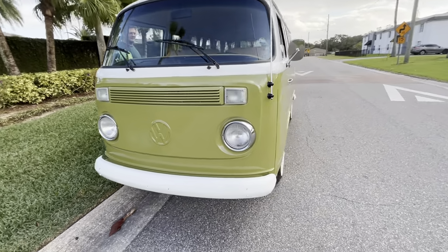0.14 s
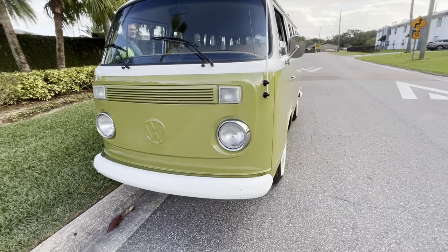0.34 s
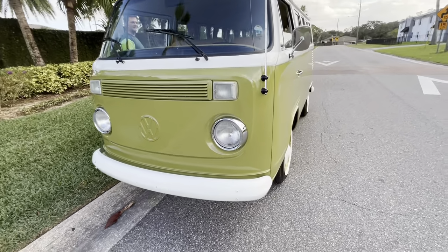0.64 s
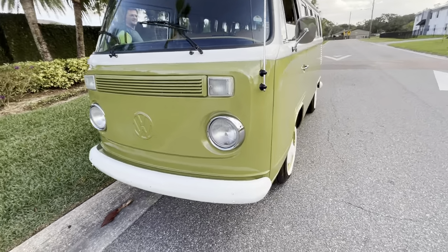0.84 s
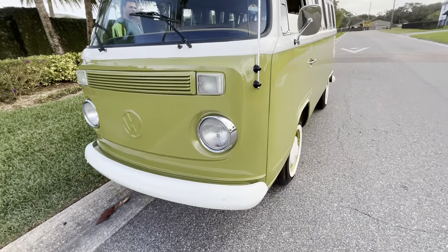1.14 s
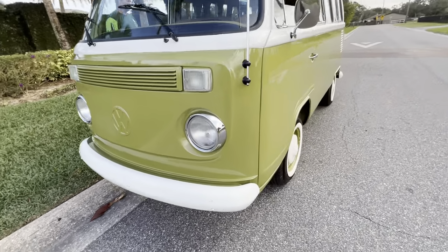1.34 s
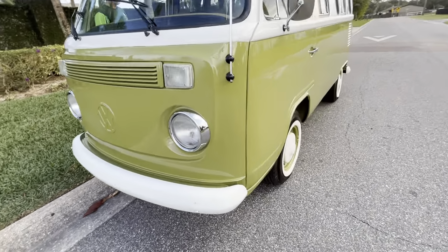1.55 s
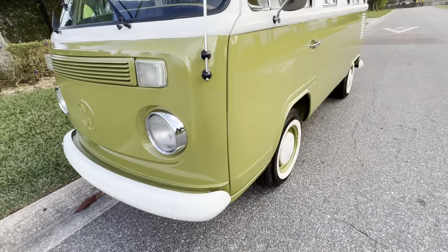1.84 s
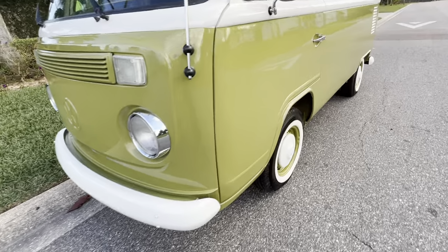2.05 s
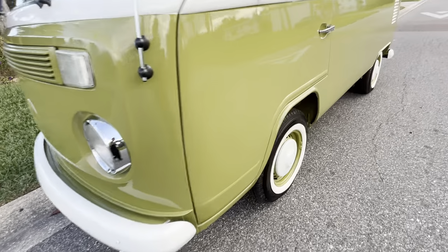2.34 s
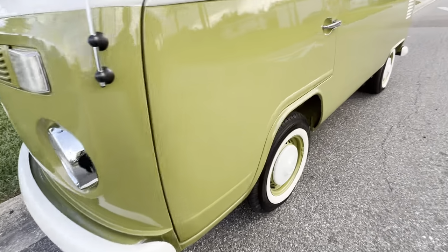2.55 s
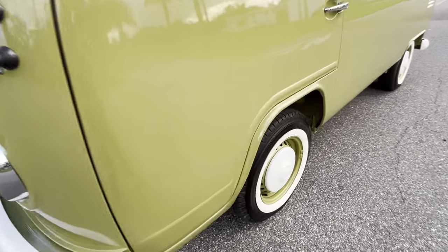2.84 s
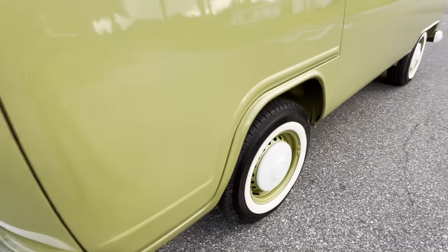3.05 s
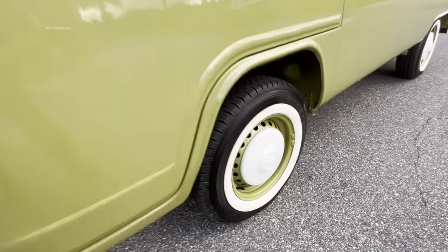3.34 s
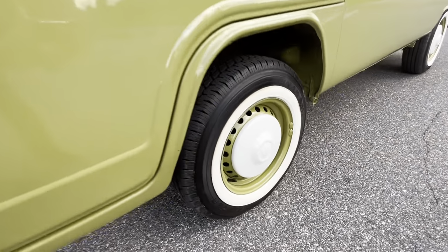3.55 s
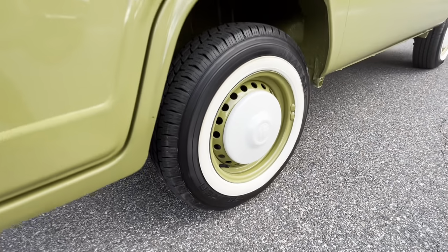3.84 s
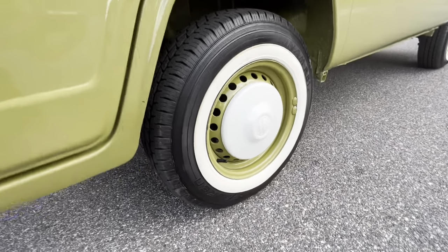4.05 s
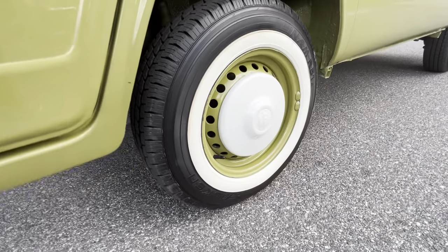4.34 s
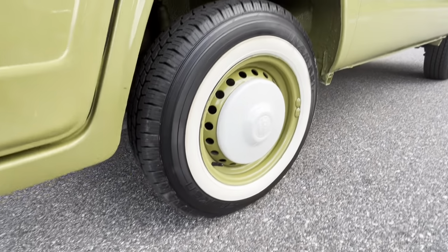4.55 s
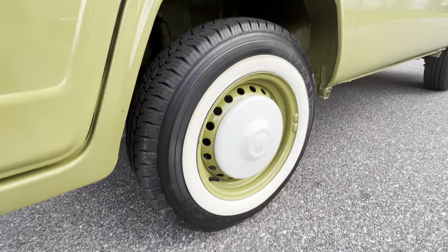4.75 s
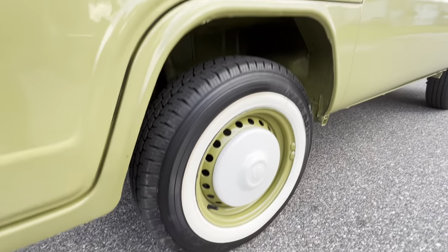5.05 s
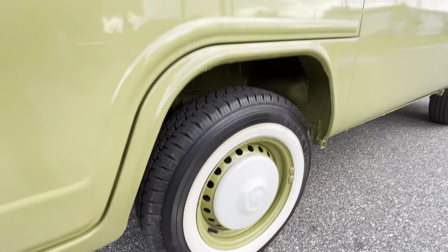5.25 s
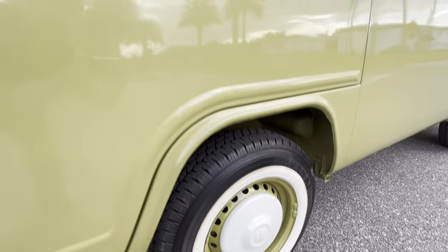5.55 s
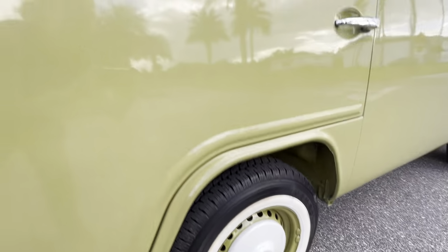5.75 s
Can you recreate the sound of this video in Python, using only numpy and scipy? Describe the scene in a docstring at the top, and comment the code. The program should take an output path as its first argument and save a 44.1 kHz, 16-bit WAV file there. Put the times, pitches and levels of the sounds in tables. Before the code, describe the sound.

Outdoors on a quiet roadside, an old van's air-cooled engine idles at its far end. A low, lumpy exhaust throb runs under fan rush and metallic valve clatter. Wind gusts rumble on the stereo microphones early, and a sharp click lands just before two seconds. As the handheld microphone rounds the front corner to the wheel, the engine becomes fuller, brighter and boomier.

```python
"""A deep, uneven throb comes first: the exhaust of an air-cooled flat-four idling in the tail of an old van.
Four pulses per cycle ring the silencer, the block knocks, a fan rushes, and valves and a tappet clatter.
Gusts, made of rumbling noise, buffet the microphones early on, and one sharp click rings three-tenths in.
The listener walks from the nose to the front wheel; most parts grow as the body stops shading them."""
import sys
import numpy as np
from scipy import signal
from scipy.fft import rfft, irfft, next_fast_len
from scipy.io import wavfile

SR = 44100
rng = np.random.default_rng(int(sys.argv[2]) if len(sys.argv) > 2 else 0)


def transcribe(u):
    """Save the signal u as a 16-bit wav file named by the first command-line argument.

    u: samples, shape (n,) or (channels, n), limited to [-1, 1]; the rate is SR.
    q: integer samples, one column per channel.
    """
    v = np.clip(np.atleast_2d(u).T, -1, 1)
    q = np.round(v * 32767).astype(np.int16)
    wavfile.write(sys.argv[1], SR, q)


N = 259749
TIME = np.arange(N) / SR


def from_db(db):
    """Turn decibels into a plain gain."""
    return 10 ** (np.asarray(db) / 20)


def rms_one(x):
    """Scale a sound to an average (rms) strength of 1."""
    return x / np.sqrt(np.mean(x ** 2) + 1e-20)


def white():
    """Two unrelated noises with equal power at all frequencies."""
    return rng.standard_normal((2, N))


def in_time(rows):
    """Read each column of a table at every sample, with straight lines between the points."""
    seconds, *columns = np.transpose(rows)
    return [np.interp(TIME, seconds, column) for column in columns]


def at_hz(points, hz):
    """Read a table along a logarithmic frequency axis, as pitch is heard."""
    table_hz, value = np.transpose(points)
    return np.interp(np.log(hz + 1), np.log(table_hz), value)


def panned(db):
    """Left and right gains that differ by this many decibels."""
    return from_db(np.array([[.5], [-.5]]) * db)


def passing(at_s, fade_s):
    """Rises smoothly from 0 to 1 as the listener passes a point."""
    return .5 + .5 * np.tanh(.5 * (TIME - at_s) / fade_s)


def swell(at_s, half_s, db):
    """A bell-shaped rise and fall of gain."""
    return from_db(db) * np.exp(-((TIME - at_s) / half_s) ** 2)


# where the listener stands: (time [s], place [0 = nose, 1 = beside the wheel arch])
WALK = [(0, 0.024), (1.5, 0.029), (2.65, 0.59), (3.3, 0.85), (4.1, 0.96), (5.2, 0.97), (5.89, 0.83)]


def blend(nose, wheel):
    """Pass from the value or sound at the nose to the one at the wheel."""
    beside = in_time(WALK)[0]
    return (1 - beside) * nose + beside * wheel


# each part by name: (level in the open at the nose [dB], gain by the wheel [dB], loss in full shade [dB])
PART_LEVELS = { "scatter": (-35.5, 0.73, 0), "bass spread": (-47, 4, 4), "puffs": (-35, -2, 3.7),
               "block": (-41, 2.03, 5.5), "fan": (-47, 5.7, -0.19), "reflection": (-56.5, 10.8, 3.1),
               "clatter": (-39.5, 0.42, 6.04), "sizzle": (-57.5, 4.4, 7.8), }
# stepping round the front corner brings the engine out of the body's shade
SHADE_ENDS_S, SHADE_FADE_S = 1.87, 0.56


def loudness(part):
    """A part's gain changes with nearness and as the body stops shading it."""
    open_db, near_db, shade_db = PART_LEVELS[part]
    shade = 1 - passing(SHADE_ENDS_S, SHADE_FADE_S)
    return from_db(open_db + blend(0, near_db) - shade_db * shade)


def resonate(x, hz, width):
    """One springy part or air space rings at its own pitch; a narrow width [Hz] rings long; top gain 1."""
    r = np.exp(-np.pi * width / SR)
    feed = np.array([1, 0, -1]) * (1 - r * r) / 2
    feedback = [1, -2 * r * np.cos(2 * np.pi * hz / SR), r * r]
    return signal.lfilter(feed, feedback, x + 1e-18)


def ringing(x, modes):
    """A metal part answers in its modes, each radiating its own way."""
    out = 0
    for hz, width, nose_db, wheel_db, pan_db in modes:
        gain = from_db(blend(nose_db, wheel_db)) * panned(pan_db)
        out = out + gain * resonate(x, hz, width)
    return out


# how alike the two microphones hear the sound: (frequency [Hz], likeness [1 = the same, 0 = unrelated])
MIC_LIKENESS = [(150, 0.77), (300, 1), (600, 0.3), (1200, 0.47), (2500, 0.16), (5000, 0.13), (9000, 0.057),
                (13000, 1)]
# how far the left microphone is ahead: (frequency [Hz], phase lead [radians])
LEFT_LEAD = [(100, 0), (190, -.35), (400, -.1), (700, .5), (1400, .3), (2200, 1.5), (8000, 2.2), (9500, 1),
             (11500, .1), (12500, -.7), (14500, -2.0)]
# shading of the microphones: (frequency [Hz], left over right [dB])
MIC_SHADING = [(200, 0.5), (700, 1), (1400, 3.5), (2600, 1), (3600, 4.5), (4600, 5), (5600, 3), (7000, 3.5),
               (8200, 1.5), (9500, -6), (11500, -1), (15000, 1)]


def radiate(drive, spectrum):
    """Two unrelated drives become a coloured stereo pair, partly alike and a little out of step; rms 1."""
    size = next_fast_len(N + 4096)
    hz = np.arange(size // 2 + 1) * SR / size
    mid, side = rfft(drive, size)
    alike = np.clip(at_hz(MIC_LIKENESS, hz), -.99, .99)
    pair = np.sqrt(1 + alike) * mid + np.sqrt(1 - alike) * side * [[1], [-1]]
    pair[0] *= np.exp(1j * at_hz(LEFT_LEAD, hz))
    colour = from_db(at_hz(spectrum, hz)) * panned(at_hz(MIC_SHADING, hz))
    return rms_one(irfft(pair * colour, size)[:, :N])


def recurring(cycle, share):
    """Two noises of which a share of the power comes back each cycle, as the same parts move the same way."""
    pattern = rng.standard_normal((2, SR))
    turn = np.floor(cycle)
    samples_into_cycle = np.arange(N) - np.searchsorted(turn, turn)
    return np.sqrt(share) * pattern[:, samples_into_cycle] + np.sqrt(1 - share) * white()


def strokes(cycle, place, spread_db, jitter_s):
    """One impulse each time the engine passes a place in its cycle, varying in time and strength."""
    turns = np.arange(np.ceil(cycle[0] - place), cycle[-1] - place) + place
    chance = rng.standard_normal((len(turns), 2))
    at = (np.interp(turns, cycle, TIME) + jitter_s * chance[:, 0]) * SR
    out = np.zeros(N)
    out[np.clip(at.astype(int), 0, N - 1)] = from_db(spread_db * chance[:, 1])
    return out


def bursts(cycle, contacts, spread_db):
    """Envelope of contacts whose energy builds up and dies away under the van; rms 1."""
    power = 0
    for place, db, rise, decay in contacts:
        hits = from_db(db) * strokes(cycle, place, spread_db, jitter_s=0.00027)
        up, down = np.exp(-1 / (SR * rise)), np.exp(-2 / (SR * decay))
        # two smoothing steps in a row: one builds the energy up, one lets it fade
        feedback = np.convolve([1, -up], [1, -down])
        power = power + signal.lfilter([1 - up], feedback, hits ** 2 + 1e-18)
    return rms_one(np.sqrt(power))


# one firing per cylinder: (place in the two-turn cycle [0-1], relative level [dB])
FIRING_ORDER = [(0.055, -1.6), (0.283, -2.3), (0.557, -2.4), (0.806, 0.0)]
# silencer and tailpipe resonances: (frequency [Hz], width [Hz], signed gain at the nose, at the wheel)
SILENCER_MODES = [(35.7, 6.1, -0.48, -0.16), (46, 4.1, 0.015, -0.79), (56.3, 6, 0.85, 0.051),
                  (64, 16.3, 0.97, 0.9), (92.3, 21.4, -0.18, -0.47), (108, 12, 0.13, 0.082),
                  (123.4, 12.4, -0.52, -0.53), (130, 9, -0.24, 0.26), (173.6, 11, -0.095, 0.062),
                  (256.3, 30, 0.078, -0.049), (301.6, 32, 0.054, 0.031), (320, 56, 0.022, -0.00086),
                  (420, 92, 0.00065, 0.015)]
# strength of the exhaust's boom along the walk: (time [s], level [dB])
BOOM_LEVEL = [(0, -31), (.65, -34.5), (1.3, -30), (2.3, -30.5), (2.85, -27.5), (3.15, -24.5), (4.1, -22),
              (5.15, -21.5), (5.89, -25.5)]
# colour of the gas puffs at the nose: (frequency [Hz], relative level per hertz [dB])
NOSE_PUFF_COLOUR = [(120, 3), (165, 1.5), (205, -2.5), (280, -3), (420, -4.5), (520, -6.5), (620, -8.5),
                    (800, -16), (1500, -69.5)]
# colour of the gas puffs at the wheel: (frequency [Hz], relative level per hertz [dB])
WHEEL_PUFF_COLOUR = [(120, -6), (190, 0.5), (235, 2.5), (290, 3), (370, -4), (440, -1.5), (520, -21.5),
                     (620, -36), (800, -35), (1500, -50)]
# bass scattered by road and body: (frequency [Hz], relative level per hertz [dB])
SCATTER_COLOUR = [(20, -27), (35, -15), (50, -4), (70, 7), (105, -1.5), (140, -0.5), (200, -17.5),
                  (500, -64.5)]


def exhaust(cycle):
    """Each firing rings the silencer and pipe and blows a puff of turbulent gas."""
    pulses = sum(from_db(db) * strokes(cycle, place, spread_db=0.92, jitter_s=0.00022)
                 for place, db in FIRING_ORDER)
    pulses = signal.sosfilt(signal.butter(2, 30, "high", fs=SR, output="sos"), pulses)
    pulses = signal.sosfilt(signal.butter(2, 900, fs=SR, output="sos"), pulses)
    rings = np.array([resonate(pulses, hz, width) for hz, width, _, _ in SILENCER_MODES])
    nose, wheel = np.array(SILENCER_MODES)[:, 2:].T @ rings
    throb = from_db(in_time(BOOM_LEVEL)[0]) * blend(rms_one(nose), rms_one(wheel))

    # gas bursts come a little after each firing, over a steady flow
    gas_bursts = [(place + .04, db, .003, .025) for place, db in FIRING_ORDER]
    flow = np.hypot(bursts(cycle, gas_bursts, spread_db=.5), 1.15)
    gas = recurring(cycle, share=0.6) * flow
    puffs = blend(radiate(gas, NOSE_PUFF_COLOUR), radiate(gas, WHEEL_PUFF_COLOUR))

    # scattered bass: one part is the same in both microphones, one is opposite
    shared, sideways = radiate(recurring(cycle, share=0.85), SCATTER_COLOUR)
    opposite = sideways * [[1], [-1]]
    scatter = loudness("scatter") * shared + loudness("bass spread") * opposite
    return throb + loudness("puffs") * puffs + scatter


# block contacts: (place in cycle [0-1], relative level [dB], energy build-up time constant [s],
# amplitude fade time constant [s])
BLOCK_KNOCKS = [(0.98, -25, 0.011, 0.033), (0.18, -12, 0.00043, 0.015), (0.462, -15.5, 0.0021, 0.013),
                (0.68, -12.5, 0.014, 0.028)]
# ringing crankcase: (frequency [Hz], width [Hz], gain at the nose [dB], at the wheel [dB],
# left over right [dB])
BLOCK_MODES = [(691, 27, -46, -3.5, -9), (779, 19, -7, 4, -0.5), (822, 44, -6.5, -7, 2),
               (882, 50, 1, 0, -0.5), (979, 35, -0.5, -17, 9.5)]


def block(cycle):
    """Combustion knocks ring the crankcase over a steady churn, with one separate knock each cycle."""
    churn = recurring(cycle, share=0.61) * np.hypot(bursts(cycle, BLOCK_KNOCKS, spread_db=1.0), .9)
    shaking = radiate(churn, [(300, -6), (650, 2.5), (950, 1.0), (1600, -35)])
    case = rms_one(ringing(shaking, BLOCK_MODES))
    blow = strokes(cycle, 0.94, spread_db=1.0, jitter_s=0.0003)
    knock = rms_one(resonate(resonate(blow, 771, 54), 840, 120))
    return loudness("block") * (case + from_db(blend(-19.5, -7.0)) * knock)


# colour of the cooling air: (frequency [Hz], relative level per hertz [dB])
FAN_COLOUR = [(450, -37), (580, -9.5), (700, 5.5), (950, 1.5), (1100, 1), (1700, -2.5), (2150, -5),
              (2600, -2), (3500, -1), (6000, -18), (8000, -35), (15000, -51)]
# ringing tin shroud: (frequency [Hz], width [Hz], gain at the nose [dB], at the wheel [dB],
# left over right [dB])
SHROUD_MODES = [(1127, 12.5, -11, 12, -11), (1360, 130, -0.5, -1, -3), (1728, 31, -6, 4, -2),
                (1867, 70, -2.5, 7, -14), (2580, 93, -9, 5, 4)]


def fan(cycle):
    """Cooling air rushes through the tin shroud, pulsing slightly four times a cycle."""
    pulsing = 1 + .15 * np.cos(2 * np.pi * 4 * (cycle - .09))
    air = radiate(recurring(cycle, share=.25) * pulsing, FAN_COLOUR)
    return loudness("fan") * rms_one(air + ringing(air, SHROUD_MODES))


# a band of fan noise that road and body reflect sinks as the wheel arch comes near
REFLECTION_NOSE_HZ, REFLECTION_WHEEL_HZ, REFLECTION_HALF_WIDTH_HZ = 1586, 1319, 122
ARCH_REACHED_S, ARCH_FADE_S, ARCH_LIFT_DB = 3.47, 0.11, 5.5


def reflection():
    """A reflected band of fan noise; it slides down and flares briefly at the wheel arch."""
    slide_hz = REFLECTION_WHEEL_HZ - REFLECTION_NOSE_HZ
    centre_hz = REFLECTION_NOSE_HZ + slide_hz * passing(ARCH_REACHED_S, ARCH_FADE_S)
    # smooth complex noise is moved up to the sliding pitch
    low_pass = signal.butter(2, REFLECTION_HALF_WIDTH_HZ, fs=SR, output="sos")
    slow_noise = signal.sosfilt(low_pass, white() + 1j * white())
    band = (slow_noise * np.exp(2j * np.pi * np.cumsum(centre_hz) / SR)).real
    flare = from_db(ARCH_LIFT_DB * swell(ARCH_REACHED_S, 2 * ARCH_FADE_S, 0))
    return loudness("reflection") * flare * radiate(band, [(1000, 0), (2000, 0)])


# where one tin resonance beams at the listener: (time [s], half length [s], frequency [Hz], width [Hz],
# peak level [dB])
TIN_BEAMS = [(0.098, 0.41, 2610, 170, -51.5), (1.15, 0.88, 1594, 290, -49), (2.2, 0.47, 376, 298, -43.5),
             (3.7, 0.38, 285, 110, -44.5), (2.041, 0.3, 864, 120, -45.5), (3.035, 0.45, 1710, 110, -52),
             (3.125, 0.16, 990, 240, -45.5), (2.0, 0.24, 782, 24, -44), (2.905, 0.32, 905, 45, -44),
             (2.942, 0.63, 300, 108, -41), (3.4, 0.45, 810, 130, -42), (4.5, 0.58, 666, 59, -47),
             (4.555, 0.79, 715, 24, -43), (4.398, 0.72, 788, 29.8, -51), (4.394, 0.92, 370, 170, -43.5),
             (5.35, 0.28, 1830, 118.3, -45), (5.7, 0.42, 790, 104, -36), (5.852, 0.33, 1380, 328, -41.5)]


def tin_hum(cycle):
    """The engine shakes narrow resonances of tin and body, each heard best from one spot."""
    shake = radiate(recurring(cycle, share=.5), [(200, 0), (3000, 0)])
    out = 0
    for at_s, half_s, hz, width, db in TIN_BEAMS:
        ring = rms_one(resonate(resonate(shake, hz, width), hz, width))
        out = out + swell(at_s, half_s, db) * ring
    return out


# clean hum locked to the crank: (multiple of the cycle rate, level at the nose [dB], at the wheel [dB])
HUM_TONES = [(6, -50, -50), (11, -45, -38), (20, -48, -45.5)]


def hum(cycle):
    """The shaking engine hums at steady multiples of its cycle."""
    out = 0
    for multiple, nose_db, wheel_db in HUM_TONES:
        tone = rms_one(np.sin(2 * np.pi * multiple * cycle))
        out = out + from_db(blend(nose_db, wheel_db)) * tone
    return out


# valve contacts: (place in cycle [0-1], relative level [dB], energy build-up time constant [s],
# amplitude fade time constant [s])
VALVE_CONTACTS = [(-.012, 7, 0.0095, 0.0082), (.115, -1, 0.0011, 0.025), (.285, 7.5, 0.019, 0.0078),
                  (.54, -13, 0.013, 0.035), (.76, -11.5, 0.0048, 0.022)]
# contacts that sizzle, with the same columns: (place [0-1], relative level [dB], build-up [s], fade [s])
SIZZLE_CONTACTS = [(-.014, 4, 0.0023, 0.03), (.28, 11.5, 0.013, 0.0055), (.54, -10.5, .005, 0.016),
                   (.76, -2.5, 0.0082, 0.015)]
# colour of the rattle: (frequency [Hz], relative level per hertz [dB])
CLATTER_COLOUR = [(900, 2), (1700, 2.5), (2400, 3.5), (3500, -3), (4500, 4), (5700, 0.5), (6600, -4.5),
                  (7900, -13.5), (10000, -17), (15000, -31)]
# colour of the sizzle: (frequency [Hz], relative level per hertz [dB])
SIZZLE_COLOUR = [(5000, -56), (7000, -3.5), (8000, 1), (9400, 9.5), (11000, 6.5), (13000, 6), (14300, 3),
                 (15700, -62)]
# ringing rocker covers: (frequency [Hz], width [Hz], gain at the nose [dB], at the wheel [dB],
# left over right [dB])
COVER_MODES = [(2610, 99, 3, 0, -12.5), (2886, 140, 5, 4.5, -8), (3110, 64, -6, 7, 11.5),
               (3340, 110, -35, 3, -22), (3620, 130, -36, 14, -8), (3740, 45, -6, 4, 16.5),
               (4037, 47, 2.5, 3.5, 7.5), (4590, 77, -2, -29, 8), (5060, 81, -1, -2, 9),
               (5560, 190, -38, -4.5, 18), (6240, 880, 1.5, -11, -4)]
# extra clatter at the front corner: (time [s], half length [s], level of the added part [dB])
CORNER_EXTRA = (2.94, 0.24, -12)


def valve_gear(cycle):
    """Loose rockers and tin rattle in gritty bursts, twice hard in each cycle."""
    # the noise changes strength at random every 16 samples
    steps = from_db(1.8 * rng.standard_normal(N // 16 + 1))
    grit = rms_one(recurring(cycle, share=.4) * steps.repeat(16)[:N])
    rattle_gate = np.hypot(bursts(cycle, VALVE_CONTACTS, spread_db=0.8), .22)
    sizzle_gate = np.hypot(bursts(cycle, SIZZLE_CONTACTS, spread_db=2.4), .14)
    rattle = radiate(grit * rattle_gate, CLATTER_COLOUR)
    sizzle = loudness("sizzle") * radiate(grit * sizzle_gate, SIZZLE_COLOUR)
    clatter = loudness("clatter") * rms_one(rattle + ringing(rattle, COVER_MODES))
    return (1 + swell(*CORNER_EXTRA)) * clatter + sizzle


# points of the walk at which the tappet's levels are given: (time [s])
TAPPET_TIMES = [1.2, 2.298, 3.5, 4.1, 4.6, 5.1]
# what the slack tappet rings: (frequency [Hz], width [Hz], build-up width [Hz], left over right [dB],
# then one level at each of those points [dB])
TAPPET_RINGS = [ (2594, 15, 120, -6, -70.5, -64, -84, -52, -61, -64),
                (3163, 38, 180, 2, -70, -56, -55, -52, -57, -50.5),
                (3286, 70, 180, 10, -69, -62, -54, -67, -69, -55),
                (3590, 30, 130, -2, -76, -74, -63, -47.5, -46.5, -56),
                (3680, 32, 130, -1, -76, -72, -60, -51.5, -51, -57),
                (5180, 48, 99, 9, -86, -56.5, -58, -78, -68, -61),
                (5270, 53, 90, 2, -92, -61, -60, -68, -74, -56),
                (5500, 60, 110, -12, -95, -58, -68, -74, -80, -62),
                (7130, 57, 110, -3, -74, -61, -60.5, -76, -83, -62)]


def tappet(cycle):
    """One slack tappet strikes each cycle; which cover modes reach the listener changes along the walk."""
    tap = strokes(cycle, 0.001, spread_db=1.0, jitter_s=.0004)
    out = 0
    for hz, width, build_up, pan_db, *levels_db in TAPPET_RINGS:
        ring = rms_one(resonate(resonate(tap, hz, width), hz, build_up))
        gain = from_db(np.interp(TIME, TAPPET_TIMES, levels_db))
        out = out + gain * panned(pan_db) * ring
    return out


# steady hiss between the swells: (low edge [Hz], high edge [Hz], level [dB])
STEADY_HISS = (5500, 9900, -63)
# swells of soft high hiss: (time [s], half length [s], low edge [Hz], high edge [Hz], peak level [dB])
SOFT_SWELLS = [(0.72, 0.061, 8500, 9950, -57), (2.96, 0.36, 5550, 7300, -46),
               (2.99, 0.28, 9000, 10450, -53), (3.03, 0.35, 7800, 10200, -55),
               (5.73, 0.32, 6000, 7300, -51)]


def hiss():
    """Smooth bands of high noise, faint but for a few brief swells."""
    air = radiate(white(), [(4000, 0), (15000, 0)])

    def band(low_hz, high_hz):
        """Keep only the noise between two frequencies."""
        return rms_one(signal.sosfilt(signal.butter(3, [low_hz, high_hz], "band", fs=SR, output="sos"), air))

    low_hz, high_hz, db = STEADY_HISS
    out = from_db(db) * band(low_hz, high_hz)
    for at_s, half_s, low_hz, high_hz, db in SOFT_SWELLS:
        out = out + swell(at_s, half_s, db) * band(low_hz, high_hz)
    return out


# gusts that buffet the microphones: (time [s], half length [s], peak level [dB])
GUST_TIMES = [(0.623, 0.07, -34), (0.76, 0.092, -31.5), (0.95, 0.06, -38), (1.243, 0.05, -41),
              (1.416, 0.047, -33), (1.52, 0.04, -34), (1.78, 0.098, -37), (1.963, 0.11, -31),
              (2.17, 0.063, -26.5), (2.27, 0.06, -31), (2.34, 0.034, -24.5), (2.416, 0.05, -34)]
# their rumble: (frequency [Hz], relative level per hertz [dB])
WIND_COLOUR = [(25, -10), (50, 1), (75, 5.5), (110, 0), (160, -1.5), (230, -12), (330, -19), (600, -35),
               (1500, -67)]
WIND_LIKENESS = -0.66   # the two microphones are mostly pushed opposite ways


def wind():
    """Short gusts push on the microphones and rumble on the way round the nose."""
    colour = from_db(at_hz(WIND_COLOUR, np.arange(N // 2 + 1) * SR / N))
    mid, side = rms_one(irfft(rfft(white()) * colour, N))
    rumble = np.sqrt(1 + WIND_LIKENESS) * mid + np.sqrt(1 - WIND_LIKENESS) * side * [[1], [-1]]
    # the powers of overlapping gusts add
    strength = np.sqrt(sum(swell(*gust) ** 2 for gust in GUST_TIMES))
    return rms_one(rumble) * strength


# a lone sharp click: (time [s], peak level [dB])
CLICK_TIMES = [(1.7312, -22)]
# what the click rings with: (frequency [Hz], width [Hz], relative starting level [dB])
CLICK_RINGS = [(1290, 700, 0), (2080, 900, -5), (3000, 800, -4), (6540, 1800, -20)]


def click():
    """A small hard contact sets off short rings, over in a few milliseconds."""
    out = 0
    for at_s, peak_db in CLICK_TIMES:
        hit = (np.arange(N) == int(at_s * SR)).astype(float)
        # a wide resonance starts louder, so divide by its width
        sound = sum(from_db(db) / width * resonate(hit, hz, width) for hz, width, db in CLICK_RINGS)
        out = out + from_db(peak_db) * sound / np.abs(sound).max()
    return out


# idle speed: (time [s], crank speed [turns per minute])
IDLE_SPEED = [(0.0, 1058.0), (0.39, 1065.7), (0.79, 1067.0), (1.18, 1060.0), (1.57, 1060.1), (1.96, 1061.1),
              (2.36, 1066.8), (2.75, 1071.1), (3.14, 1067.1), (3.53, 1052.9), (3.93, 1051.3),
              (4.32, 1053.1), (4.71, 1060.0), (5.1, 1052.0), (5.5, 1050.4), (5.89, 1054.9)]
START_CYCLE = .0466   # place in the engine cycle at the start, 0-1


def scene():
    """The crank, two turns to a cycle, times the engine's beats; air, wind and click are added."""
    cycle = START_CYCLE + np.cumsum(in_time(IDLE_SPEED)[0]) / (120 * SR)
    engine = exhaust(cycle) + block(cycle) + fan(cycle) + reflection() + tin_hum(cycle) + hum(cycle)
    return engine + valve_gear(cycle) + tappet(cycle) + hiss() + wind() + click()


# the microphone's loss of deep bass: (frequency [Hz], level [dB])
BASS_LOSS = [(22, -18), (33, 0)]
CUTOFF_HZ = 15400


def record(dry):
    """The microphone loses the deepest rumble, and a steep filter removes the top."""
    size = next_fast_len(N + SR)
    hz = np.arange(size // 2 + 1) * SR / size
    dry = irfft(rfft(dry, size) * from_db(at_hz(BASS_LOSS, hz)), size)[:, :N]
    return signal.sosfilt(signal.ellip(10, .2, 80, CUTOFF_HZ, fs=SR, output="sos"), dry)


dry = scene()
out = record(dry)
transcribe(out)
```